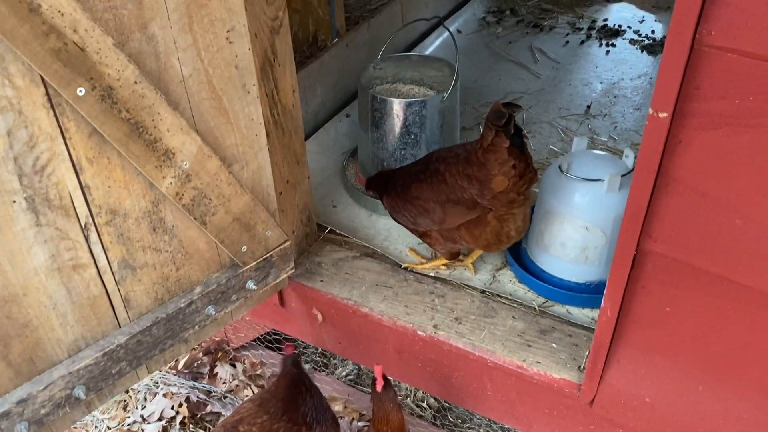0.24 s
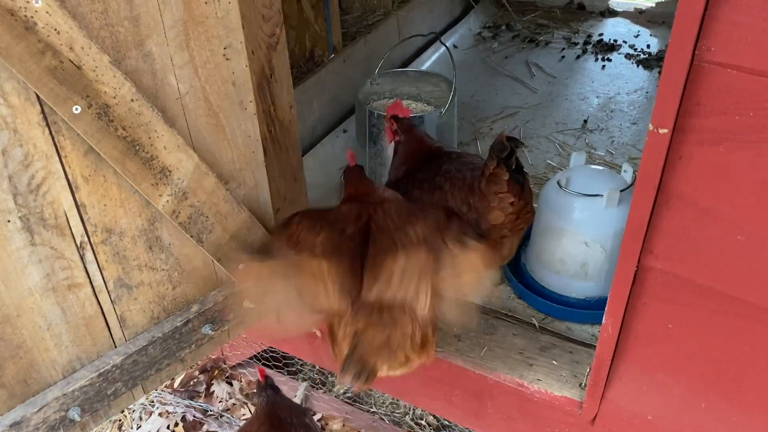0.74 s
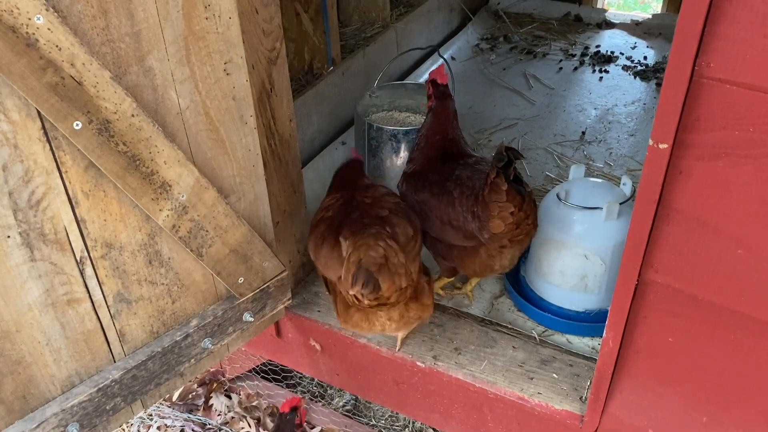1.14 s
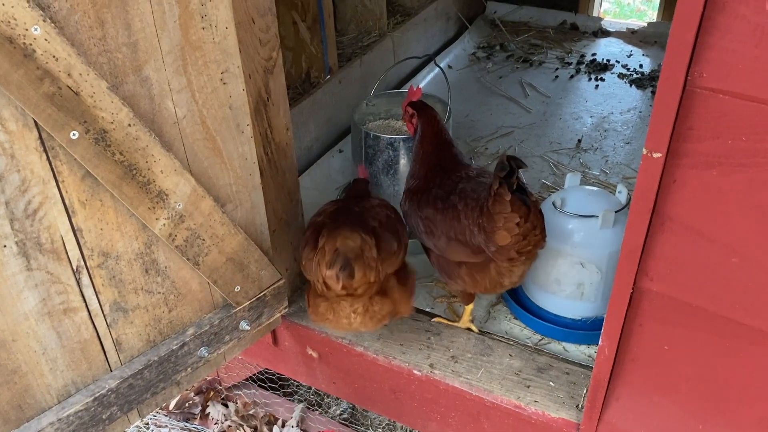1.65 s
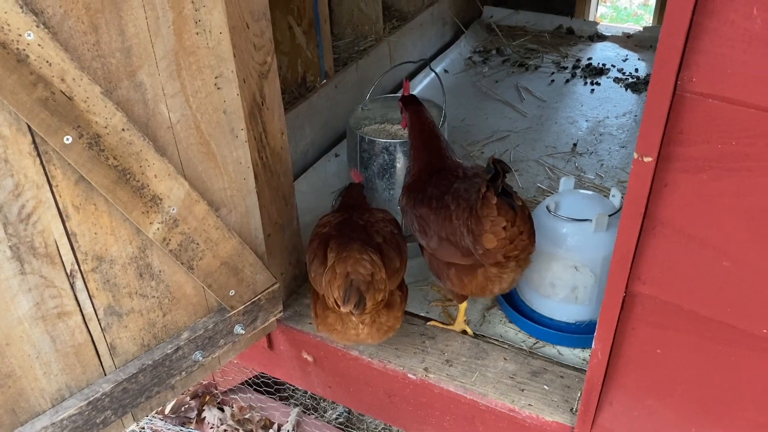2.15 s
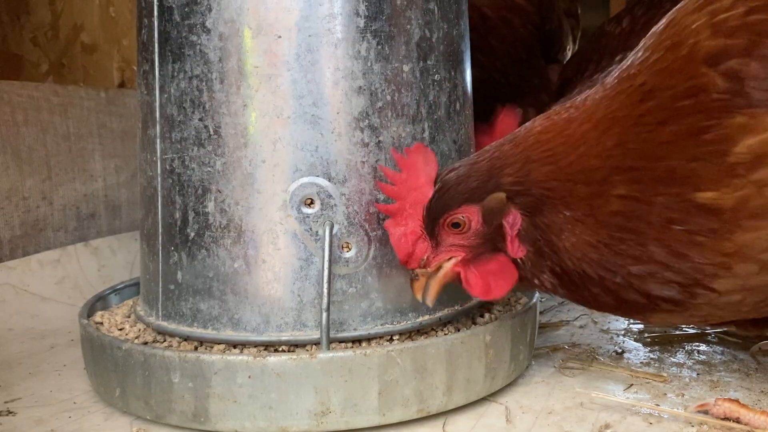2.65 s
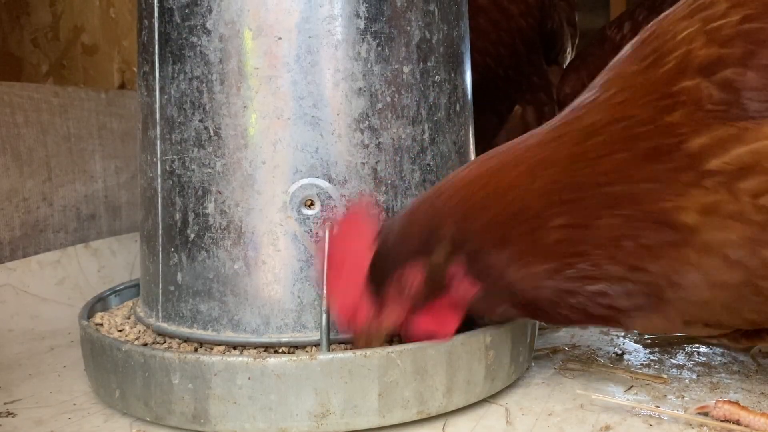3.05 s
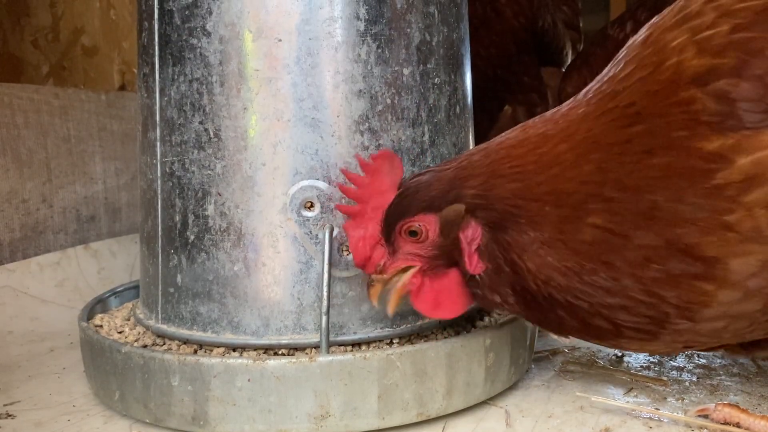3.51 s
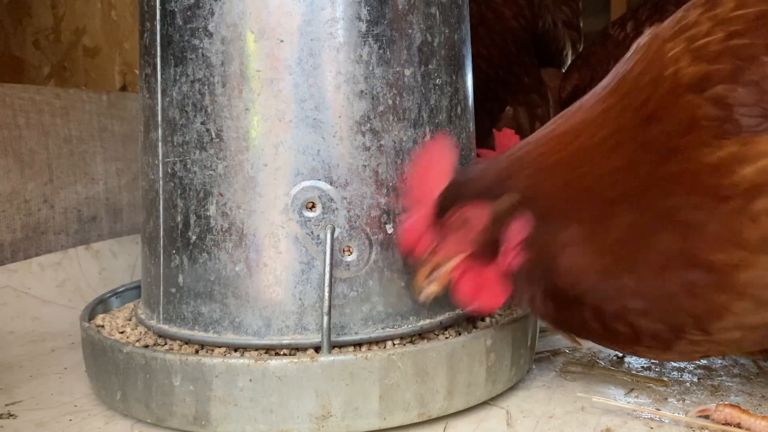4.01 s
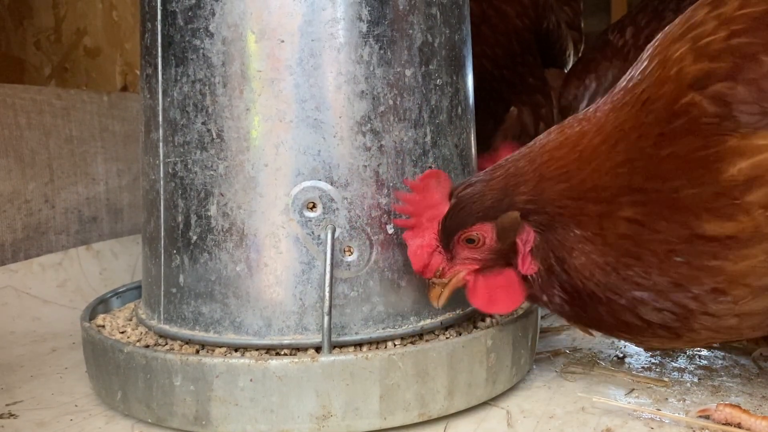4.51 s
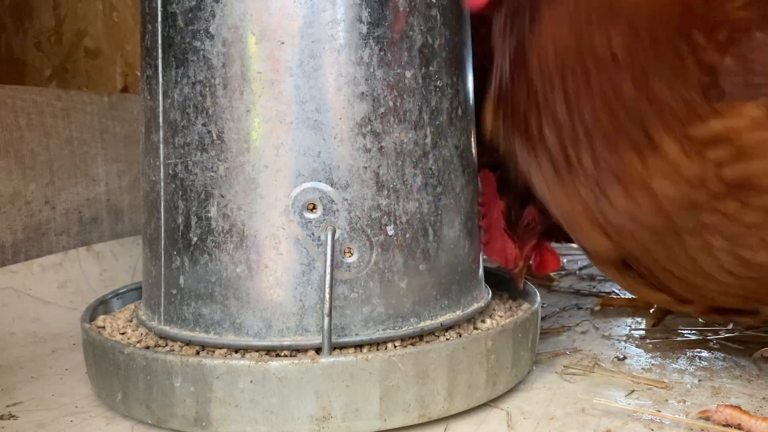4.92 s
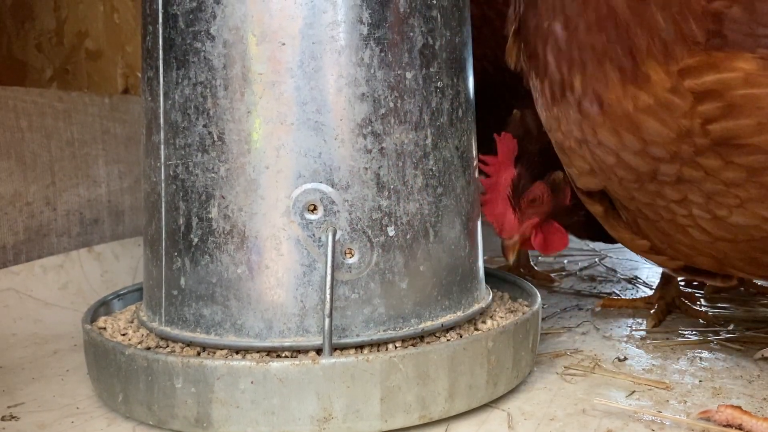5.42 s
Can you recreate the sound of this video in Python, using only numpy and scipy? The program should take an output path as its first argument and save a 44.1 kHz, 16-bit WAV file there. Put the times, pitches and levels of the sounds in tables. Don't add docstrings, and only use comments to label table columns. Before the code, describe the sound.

Leaf crackle, claw snaps and board thuds with handling rub, cutting abruptly to close-up fast pecking in a grain-filled sheet-metal feeder.

```python
import sys
import numpy as np
from scipy import signal
from scipy.fft import rfft, irfft, next_fast_len
from scipy.io import wavfile
from scipy.ndimage import uniform_filter1d

SR = 44100
rng = np.random.default_rng(int(sys.argv[2]) if len(sys.argv) > 2 else 0)


def to_wav(sig):
    pcm = np.clip(np.atleast_2d(sig), -1, 1) * 32767
    pcm = np.round(pcm).astype(np.int16)
    wavfile.write(sys.argv[1], SR, pcm.T)


def voltage_ratio(decibels):
    exponent = np.asarray(decibels, float) / 20
    return 10 ** exponent


N = 249914
TIME = np.arange(N) / SR
CHANGE_S = 2.27

# [t/s, peak level/dB, pan ring/dB, colour f/Hz, broad crackle/dB]
PECKS = [(2.374, -27.5, -41.5, 2180, -17.5), (2.6523, -29.5, -43.5, 2720, -13.5),
         (2.7545, -28, -42, 2890, -7.5), (2.9738, -38.5, -43, 5040, -8), (3.017, -31.5, -38.5, 2470, -10),
         (3.2758, -27.5, -41, 2850, -9), (3.531, -36, -44, 3277, -8.5), (3.5852, -36.5, -35, 1830, -7.5),
         (3.8857, -35.5, -37.5, 2100, -10.5), (4.2254, -29.5, -47, 1750, -17),
         (4.231, -26, -31.5, 2240, -18), (4.37, -31, -54, 1870, -16), (4.3895, -28, -37, 2370, -13),
         (4.561, -31, -40.5, 1830, -12.5), (4.5858, -34.5, -76, 2506, -18), (4.957, -36, -47.5, 4270, -6.5),
         (5.006, -29.5, -55, 3130, -11.5), (5.613, -35, -45.5, 3100, -14.5), (5.648, -33, -44, 2100, -10),
         (5.66, -29, -68, 2860, -3)]
# [t/s, peak level/dB, colour f/Hz]
FLICKS = [(2.4942, -43, 6400), (2.5104, -46, 6500), (2.536, -44, 7600), (2.547, -45, 5730),
          (2.72, -45, 7000), (2.725, -43, 6500), (2.8812, -46, 6700), (2.898, -49, 6500),
          (3.1387, -49.5, 5900), (3.3978, -42, 5940), (3.703, -38.5, 6000), (3.794, -39.5, 6950),
          (3.649, -43, 5030), (3.687, -37, 6500), (3.9972, -41, 7100), (4.045, -51.5, 4500),
          (4.1344, -36, 7060), (4.151, -35, 7400), (4.2852, -31, 8900), (4.346, -39.5, 7000),
          (4.6674, -36, 5870), (4.6797, -36, 8700), (4.701, -48, 10500), (4.7869, -50.5, 6700),
          (4.81, -42, 7400), (5.105, -41.5, 7800), (5.488, -50, 4970), (5.603, -42, 8000)]
# [f/Hz, level/dB per Hz]
CRACKLE = [(900, -15), (1800, -3.5), (3500, -3.5), (6500, -1.5), (8000, -0.5), (11000, -2.5), (15500, -9),
           (16500, -44)]


def evened(x):
    return x / np.sqrt(np.mean(x ** 2) + 1e-20)


def coloured(x, points):
    hz, db = np.transpose(points)
    size = next_fast_len(x.shape[-1])
    at = np.log(np.fft.rfftfreq(size, 1 / SR) + 1)
    gain = voltage_ratio(np.interp(at, np.log(hz + 1), db))
    return irfft(rfft(x, size) * gain, size)[..., :x.shape[-1]]


def curve(rows, k):
    return np.interp(TIME, [r[0] for r in rows], [r[k] for r in rows])


def resonate(x, hz, width):
    return signal.lfilter(*signal.iirpeak(min(hz, SR / 3), max(hz / width, .3), SR), x)


def add(mix, s, sound):
    part = mix[..., round(s * SR):][..., :sound.shape[-1]]
    part += sound[..., :part.shape[-1]]


def grainy(spread_db, hold, size=N):
    steps = evened(uniform_filter1d(rng.standard_normal(size), max(int(hold), 1)))
    return rng.standard_normal((2, size)) * voltage_ratio(spread_db * steps)


def patchy(x, patchy_db):
    z = signal.stft(x, nperseg=512)[2]
    patches = uniform_filter1d(rng.standard_normal(z.shape[1:]), size=8, axis=0)
    patches = uniform_filter1d(patches, size=14, axis=1)
    return signal.istft(z * voltage_ratio(patchy_db * evened(patches)), nperseg=512)[1][:, :N]


def swells(rows, rest_db, rise=0.61):
    tents = [db - 20 * np.maximum((s - TIME) / rise, TIME - s) / max(fall_s, .01) for s, db, fall_s in rows]
    return np.sqrt(voltage_ratio(rest_db) ** 2 + voltage_ratio(np.max(tents, axis=0)) ** 2)


def knocks(per_s, spread_db):
    where, size = rng.random((2, 5000))
    clicks = (where < per_s / SR) * voltage_ratio(spread_db * size - 10.5)
    clicks[40] = 0.75
    return clicks * rng.choice([-1., 1.], (2, 5000))


def crunches(rows, spray_s, t60, body, tail_db, tail_t60):
    out, t = np.zeros((2, N)), np.arange(5000) / SR
    for s, peak_db, body_db, hz, broad_db in rows:
        fall = voltage_ratio(-60 * np.maximum(t - spray_s, 0) / t60) + voltage_ratio(tail_db - 60 * t / tail_t60)
        fall *= np.minimum(t / 0.00099, 1)
        sizes = np.geomspace(1500, 13000, num=7) * rng.uniform(.85, 1.15, size=7)
        grains = sum(resonate(knocks(350, 16), f, .22 * f) / np.sqrt(f) for f in sizes)
        grains = evened(grains) + 0.54 * rng.standard_normal((2, 5000))
        shade = [(1.7 * hz, 0), (6 * hz, -6)]
        broad = coloured(evened(coloured(grains, CRACKLE)), shade)
        broad = broad * fall * np.minimum(t / 0.0041, 1)
        ring = 8.0 * resonate(resonate(knocks(900, 14) * fall, hz, .25 * hz), hz, .25 * hz)
        blow = knocks(900, 12.5) * fall
        dull = sum(voltage_ratio(db) * resonate(resonate(blow, f, 0.55 * w), f, 0.55 * w) for f, w, db in body)
        bright = ring + voltage_ratio(broad_db) * broad
        add(out, s - .001, voltage_ratio(peak_db - 4.0) * bright + voltage_ratio(body_db + 26) * dull)
    return out


def rings(s, db, modes, rise_s=0.0012, rattle_db=0.):
    t = np.arange(9000) / SR
    sound = np.zeros(len(t))
    for hz, mode_db, t60 in modes:
        waver = np.tanh(evened(uniform_filter1d(rng.standard_normal(len(t)), 130)))
        level = voltage_ratio(db + mode_db + rattle_db * waver - 60 * t / t60)
        sound += level * np.sin(2 * np.pi * (hz * t + rng.random()))
    out = np.zeros(N)
    add(out, s, sound * np.minimum(t / rise_s, 1))
    return out


def beaks():
    # [t/s, peak level/dB, pan ring/dB, colour f/Hz]
    rake_rows = [(2.3876, -32, -39, 1870), (2.731, -42.5, -39.5, 2280), (2.7681, -30, -39.5, 3300),
                 (2.8326, -56, -51, 1870), (2.9525, -43, -47, 1980), (3.024, -43, -43.5, 3120),
                 (3.2713, -35, -37.5, 2700), (3.2848, -32, -37.5, 4040), (3.3851, -40, -71, 1690),
                 (3.5817, -32, -38, 1794), (3.7, -41.5, -61, 1740), (3.7779, -36.5, -40, 1862),
                 (3.8274, -39.5, -50, 2360), (3.9152, -46, -46, 3320), (4.0195, -41.5, -50.5, 1670),
                 (4.3296, -39, -56, 1640), (4.968, -36.5, -46.5, 4230), (4.996, -35, -53, 2980)]
    # [f/Hz, width/Hz, level/dB]
    pan = [(387, 247, -0.5), (660, 535, -0.5), (1127, 445, 0)]
    rakes = [(*row, -14.5) for row in rake_rows]
    flicks = [(s, db, db - 20, hz, -14) for s, db, hz in FLICKS]
    # rows, spray/s, t60/s, tail level/dB
    kinds = [(PECKS, 0.0058, 0.075, -15.5), (rakes, 0.0066, 0.075, -15.5), (flicks, 0.0013, 0.032, -19)]
    return sum(crunches(rows, spray_s, t60, pan, tail_db, 0.33) for rows, spray_s, t60, tail_db in kinds)


def pops():
    # [t/s, peak level/dB]
    pop_rows = [(2.494, -50), (2.511, -47), (2.54, -55), (2.9, -56), (3.115, -55), (3.135, -55),
                (3.155, -56), (3.384, -48), (3.401, -44), (3.45, -56), (3.688, -48), (3.732, -46),
                (3.748, -50), (3.915, -49), (3.94, -54), (4.014, -42.5), (4.043, -48.5), (4.082, -54),
                (4.104, -52), (4.348, -43), (4.373, -40), (4.485, -51.5), (4.565, -38), (4.668, -52),
                (4.681, -43), (4.701, -35)]
    out = np.zeros(N)
    for s, db in pop_rows:
        hz = 1131 * (1 + 0.0094 * np.clip(-35 - db, 0, 12))
        out += rings(s, db + 0.5, [(hz, 0, .035), (0.8 * hz, -6, .03)], 0.00076)
    return out


def ticks():
    # [t/s, peak level/dB, colour f/Hz]
    tick_rows = [(0.027, -32, 3000), (0.2454, -22, 2230), (0.4025, -22, 6500), (0.5233, -27, 7000),
                 (0.529, -29, 5500), (0.5408, -23.5, 2380), (0.5478, -34, 3480), (0.551, -31, 1510),
                 (0.588, -35, 3560), (0.8886, -22, 7000), (0.89, -28, 7000), (0.8912, -27, 10900),
                 (0.892, -24, 2110), (1.4574, -19, 4940), (2.304, -50, 7000), (2.3738, -30, 1890),
                 (2.423, -49, 5500), (2.553, -48, 4500), (3.148, -47, 5800), (3.152, -50, 7000),
                 (3.384, -45, 6500), (3.446, -50, 7500), (2.654, -33, 2670), (2.8346, -36.5, 2020),
                 (2.769, -30.5, 1280), (3.2866, -23.5, 5300), (3.5325, -35, 4870), (3.539, -40, 3320),
                 (3.591, -28, 6300), (3.6915, -42, 6500), (3.7045, -48, 1700), (3.731, -52, 5000),
                 (3.745, -49, 6800), (3.778, -39.5, 1850), (3.787, -40, 2000), (3.843, -52, 6000),
                 (3.8865, -44, 2180), (3.8945, -35.5, 2090), (3.952, -52, 5000), (4.014, -44, 3800),
                 (4.02, -47, 1400), (4.044, -48, 2000), (4.2764, -43, 5000), (4.29, -38.5, 3980),
                 (4.794, -46, 9000), (4.803, -41, 9000), (4.392, -26, 2330), (5.0078, -23, 2940),
                 (5.6648, -23, 4500)]
    out, blow = np.zeros(N), signal.unit_impulse(600, 20)
    snap = np.diff(blow, prepend=0)
    for s, db, hz in tick_rows + [(s, db - 1, hz) for s, db, hz in FLICKS]:
        ring = resonate(resonate(blow, hz, 1.03 * hz), hz, .5 * hz)
        click = ring / abs(ring).max() + 0.28 * coloured(blow, CRACKLE) + 0.93 * snap
        add(out, s, voltage_ratio(db - 1.0) * click)
    return out


def bare_metal():
    # [t/s, level/dB]
    sheet_hits = [
        (2.651, -49.5),
        (3.532, -58.5),
    ]
    # [f/Hz, level/dB, t60/s]
    sheet = [(383, -6, 0.52), (784, -11, 0.48), (1084, -5.5, 0.53), (1520, -15, 0.3), (2730, -1, 0.16),
             (3930, 2.5, 0.095), (4200, -17, 0.082), (4950, 8, 0.051), (5600, 10, 0.038), (5860, -4, 0.19),
             (6400, -9, 0.069)]
    return sum(rings(s, db, sheet, rattle_db=1.0) for s, db in sheet_hits)


def jolts():
    # [t/s, peak level/dB, f/Hz, t60/s]
    jolt_rows = [
        (2.728, -43.5, 348, 0.11),
        (2.764, -36, 180, 0.11),
        (4.972, -45, 125, 0.089),
        (4.962, -53, 390, 0.061),
        (3.7, -46, 850, .06),
    ]
    return sum(rings(s, db, [(hz, 0, t60)], 0.0028) for s, db, hz, t60 in jolt_rows)


def clinks():
    # [t/s, level/dB, f/Hz, t60/s]
    clink_rows = [(0.253, -38, 1850, 0.08), (.892, -32.5, 2250, 0.073), (.897, -39.5, 550, 0.19),
                  (.903, -31, 930, 0.055), (.55, -39, 922, 0.17), (3.54, -50.5, 3250, 0.13),
                  (2.652, -30, 5850, 0.019), (3.655, -60, 3550, 0.22), (3.3, -62, 3350, 0.23),
                  (3.545, -58, 3450, .1), (3.537, -51, 4800, 0.11), (3.648, -60, 4700, 0.13),
                  (3.79, -64.5, 4400, 0.25), (3.9, -60, 3400, 0.23), (4.015, -61, 5900, 0.14),
                  (4.41, -63.5, 6540, .35), (.93, -45.5, 640, .2), (.84, -45, 700, 0.14),
                  (1.655, -47, 600, .12), (1.665, -50, 850, 0.084), (2.86, -56, 4200, .05),
                  (3.32, -52, 2800, .05), (4.588, -34, 2290, 0.015), (5.011, -57, 1010, 0.03)]
    return sum(rings(s, db, [(hz, 0, t60)], rattle_db=8.0) for s, db, hz, t60 in clink_rows)


def cluck():
    # [t/s, effort/dB, pitch f/Hz]
    effort = [
        (1.819, -55, 210.8),
        (1.827, -42, 213),
        (1.855, -38.5, 215.6),
        (1.88, -50, 219.6),
        (1.925, -61.5, 227),
    ]
    # [f/Hz, level/dB]
    throat = [(120, -29), (229, 7), (340, -14), (640, 9.5), (1000, -2.5), (1280, -3), (1950, -10.5),
              (4160, -47)]
    wobble = [evened(uniform_filter1d(rng.standard_normal(N), size=200)) for _ in range(15)]
    turns = np.cumsum(curve(effort, 2) * (1 + .012 * wobble[0])) / SR
    folds = np.zeros(N)
    for k in range(1, 15):
        folds += voltage_ratio(1.8 * wobble[k]) * np.cos(2 * np.pi * (k * turns - 0.02 * k ** 2))
    air = rng.standard_normal(N) * (1 + np.cos(2 * np.pi * turns))
    voice = coloured(evened(folds) + 0.36 * air, throat)
    edges = np.clip(np.minimum(TIME - effort[0][0], effort[-1][0] - TIME) / 0.011, 0, 1)
    return evened(voice) * voltage_ratio(curve(effort, 1) + 0.5) * edges


def claw_snaps():
    # [t/s, peak level/dB, dull part/dB, colour f/Hz, broad crackle/dB]
    snap_rows = [(0.1994, -30, -68, 5140, -14), (0.2434, -24.5, -37.5, 1930, -4.5),
                 (0.357, -32, -44, 5740, -8.5), (0.4015, -36, -76, 4750, 0.5),
                 (0.519, -34, -69, 6460, -3.5), (0.529, -32.5, -58, 5000, -7),
                 (0.543, -21, -45, 3430, -14.5), (0.555, -25, -32, 1110, -9),
                 (0.571, -21.5, -37, 2320, -18), (0.579, -26.5, -31, 2260, -10),
                 (0.586, -25.5, -38, 3600, -16), (0.595, -22.5, -38, 2350, -23),
                 (0.8314, -56, -34.5, 2420, -12.5), (0.8912, -19.5, -33, 2120, -14.5),
                 (0.903, -41, -35, 5060, -20), (1.019, -43, -47, 8100, -12),
                 (1.14, -44.5, -84, 3530, -10.5), (1.3069, -47.5, -55, 5700, -7),
                 (1.4557, -31, -36.5, 5260, -4.5), (1.6237, -40, -78, 1950, -4.5),
                 (1.637, -36.5, -36, 1870, -10)]
    body = [(726, 1600, -4.0), (1290, 190, -3.5)]  # f/Hz, width/Hz, level/dB
    return crunches(snap_rows, 0.0066, 0.068, body, -23.5, 0.77)


def feet():
    # [t/s, peak level/dB, ring f/Hz, t60/s]
    thuds = [(0.469, -38.5, 235.5, 0.16), (0.603, -32.5, 266, 0.085), (0.825, -31.5, 277, 0.059),
             (0.848, -40, 284.6, 0.17), (0.895, -20.5, 252, 0.09), (0.931, -29, 281.4, 0.1),
             (0.953, -36.5, 272.3, 0.47), (1.04, -36, 202, .12), (1.202, -35.5, 131, 0.06),
             (1.224, -31, 117, 0.09), (1.457, -43.5, 357, 0.11), (1.583, -43, 195, 0.044),
             (1.639, -34, 265, 0.12), (1.652, -34, 290, .12), (1.0, -39, 240, .15), (1.085, -38, 150, .15)]
    overtones = [(1, 0, 1), (1.17, -7, 1.6), (1.9, -12, 0.67), (2.5, -12, .5), (3.5, -15, 0.19)]
    out = np.zeros(N)
    for s, db, hz, t60 in thuds:
        modes = [(ratio * hz, mode_db, span * t60) for ratio, mode_db, span in overtones]
        out += rings(s, db, modes, rattle_db=3.0)
    return out


def rustle():
    # [t/s, level/dB]
    leaves = [
        (0.0, -41),
        (0.114, -55.5),
        (0.24, -43.5),
        (0.332, -49.5),
        (0.408, -40),
        (0.438, -47),
        (0.65, -55),
        (0.78, -50),
        (0.89, -69.5),
    ]
    # [t/s, level/dB]
    rubbing = [
        (1.8, -70.5),
        (1.85, -54),
        (1.93, -53.5),
        (2.242, -37),
        (2.25, -39),
    ]
    # [t/s, peak level/dB, time to fall 20 dB/s]
    drags = [(.47, -47, 0.2), (.584, -40.5, 0.19), (.83, -35, -0.0254), (.905, -40, 0.0366),
             (1.47, -46, 0.15), (1.65, -50.5, 0.27), (1.85, -42.5, 0.14)]
    # [f/Hz, level/dB per Hz]
    fine = [(1200, -21), (2400, -7.5), (4000, -3.5), (6500, -1.5), (8000, -2.5), (11000, -5.5), (15500, -6),
            (16500, -49)]
    coarse = [(250, -3.5), (500, -2), (1000, -1.5), (2000, -10.5), (3200, -20.5), (6000, -62)]
    level = voltage_ratio(curve(leaves + rubbing, 1))
    hiss = evened(coloured(grainy(2.0, 60), fine)) * level
    scrape_level = level * voltage_ratio(-9.5) + swells(drags, -63.5, rise=0.52)
    scrape = evened(coloured(grainy(1.25, 180), coarse)) * scrape_level * voltage_ratio(-6.5)
    gate = (TIME < 2.2495) + voltage_ratio(-17) * (TIME >= 2.2495) * (TIME < 2.265)
    return (hiss + scrape) * gate


def rolling_grain():
    # [t/s, level/dB]
    trickle = [(2.27, -68), (3.1, -68.5), (3.3, -75), (3.7, -62.5), (4.0, -59.5), (4.15, -61.5),
               (4.22, -67), (4.6, -61), (4.95, -75)]
    lumps = evened(coloured(grainy(3.6, 350), [(1, -27), (90, 1.5), (400, -24.0)]))
    starts = np.array([0] + [row[0] for row in PECKS])
    since = TIME - starts[np.searchsorted(starts, TIME, side="right") - 1]
    hollow_hz = 1300 - 1300 * np.minimum(since, .3)
    near = np.cos(2 * np.pi * np.cumsum(hollow_hz) / SR) * voltage_ratio(curve(trickle, 1))
    near *= (TIME > CHANGE_S) * (TIME < 5)
    far = np.cos(2 * np.pi * 835 * TIME) * swells([(5.4, -65.5, 0.14)], -120)
    return lumps * (near + far)


def boards():
    # [t/s, peak level/dB, time to fall 20 dB/s]
    steps = [(.08, -56.5, 0.15), (.6, -49, 0.53), (.98, -39, -0.08), (1.12, -44.5, 0.5),
             (1.66, -43.5, 0.24), (1.88, -53, 0), (2.75, -57.5, 0.24), (3.6, -52, 0.45), (5.3, -57, 1.5)]
    # [f/Hz, level/dB per Hz]
    board_hum = [(130, -35), (180, -0.5), (260, 5), (330, -5), (420, -19), (700, -40.5)]
    return evened(coloured(grainy(2.6, 440), board_hum)) * swells(steps, -64.5, rise=0.6) * voltage_ratio(-1.5)


def wind():
    # [t/s, peak level/dB, time to fall 20 dB/s]
    gusts = [(0, -45, 0.6), (.08, -30, 0), (.33, -44.5, 0.37), (.55, -42, 0.15), (1.12, -36.5, 0.2),
             (1.44, -36, 0.1), (1.66, -43.5, 0.03), (1.22, -35, -0.05), (2.08, -46.5, 0.2),
             (2.75, -55, 0.4), (3.62, -51.5, 1.5)]
    # [f/Hz, level/dB per Hz]
    rumble = [(12, -29), (20, -23), (54, 5.5), (124, -0.5), (146, -5), (200, -4.5), (260, -35), (440, -120)]
    return evened(coloured(grainy(1.5, 1500), rumble)) * swells(gusts, -53.5, rise=0.9)


def yard():
    # [f/Hz, level/dB per Hz]
    wash = [(180, -33), (320, -9.5), (392, -21), (921, -24), (1300, -28.5), (1900, -25.5), (4590, -32.5),
            (15500, -43)]
    # [t/s, level/dB]
    wash_level = [
        (0, -61.5),
        (2.25, -71),
        (2.27, -68.5),
        (4.8, -69.5),
        (5.67, -67.5),
    ]
    return evened(patchy(coloured(grainy(.6, 400), wash), patchy_db=2.8)) * voltage_ratio(curve(wash_level, 1))


def stereo_pair(mid, loose, lean, lead, loose_db, steep, shared, top_hz):
    # [f/Hz, level/dB]
    side_width = [(30, -21), (300, -11), (600, -3), (1500, -2.5), (4000, -3), (8000, -3), (12000, 0.5),
                  (15000, -4)]
    size = next_fast_len(N)
    hz = np.fft.rfftfreq(size, 1 / SR)
    halves = np.maximum(hz - 6950, 0) / 2150
    gap = np.pi / 2 * (halves // 1 + np.clip((halves % 1 - .5) * steep + .5, 0, 1))
    treble = np.clip((hz - 5800) / 800, 0, 1)
    m = rfft(mid, size)
    wide = rfft(coloured(loose, side_width) * voltage_ratio(loose_db) + lean * mid, size)
    delayed = 1j * lead * np.sin(np.pi * hz / 5200) * hz / 3000 * m
    echo = shared * m + np.sqrt(1 - shared ** 2) * rfft(loose, size)
    side = (1 - treble) * (wide + delayed) + 1j * np.sin(gap) * echo
    pair = irfft(np.array([m * np.cos(gap), side]) * (hz < top_hz), size)[:, :N]
    return np.array([pair[0] + pair[1], pair[0] - pair[1]])


def scene():
    hits = beaks() + claw_snaps()
    hits[0] += pops() + ticks() + bare_metal() + jolts() + clinks() + cluck() + feet()
    bed = rustle() + rolling_grain() + boards() + wind() + yard()
    close = stereo_pair(*hits, lean=0.15, lead=0.63, loose_db=-3.0, steep=1.04, shared=0.87, top_hz=15950)
    around = stereo_pair(*bed, lean=0.043, lead=0.13, loose_db=-0.1, steep=1.5, shared=0.75, top_hz=15300)
    return close + around


def low_pass(x):
    return signal.sosfilt(signal.butter(12, 17090, fs=SR, output="sos"), x)


def record(dry):
    ceiling = .14
    return low_pass(ceiling * np.tanh(dry / ceiling))


dry = scene()
out = record(dry)
to_wav(out)
```